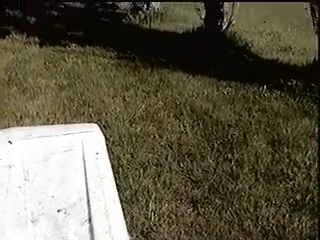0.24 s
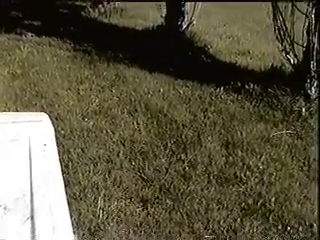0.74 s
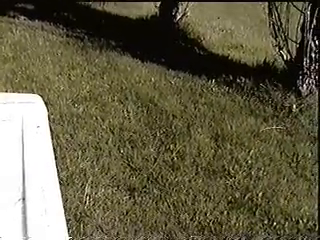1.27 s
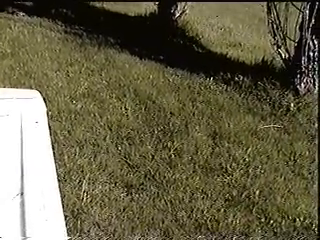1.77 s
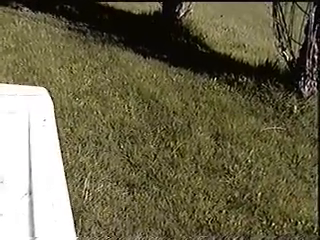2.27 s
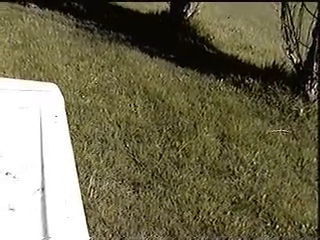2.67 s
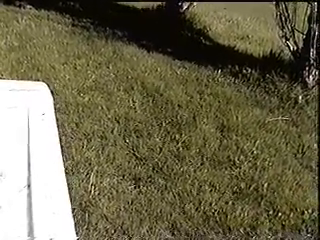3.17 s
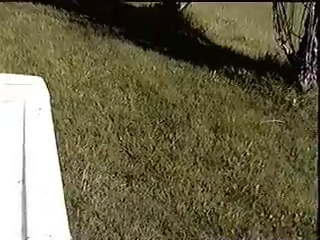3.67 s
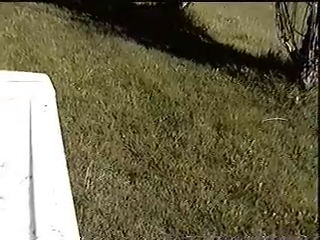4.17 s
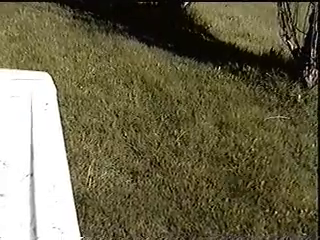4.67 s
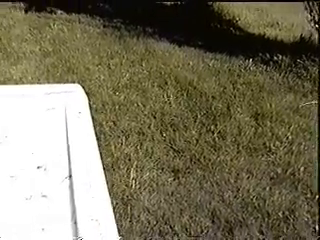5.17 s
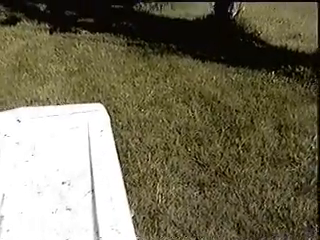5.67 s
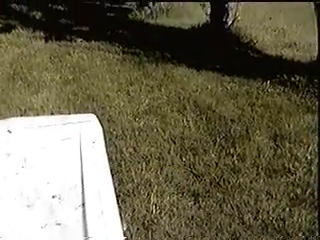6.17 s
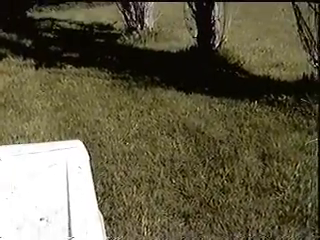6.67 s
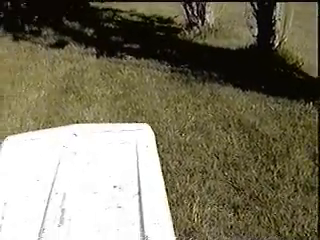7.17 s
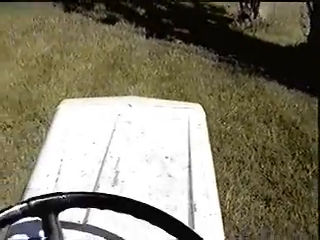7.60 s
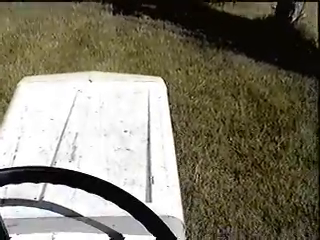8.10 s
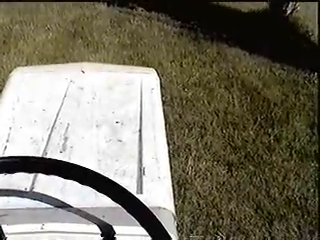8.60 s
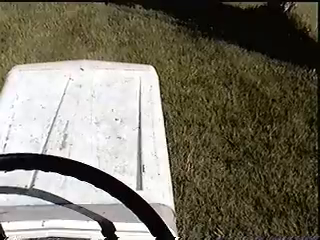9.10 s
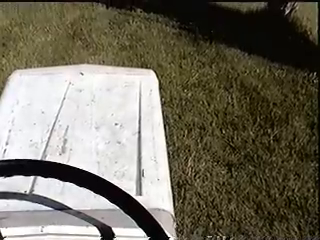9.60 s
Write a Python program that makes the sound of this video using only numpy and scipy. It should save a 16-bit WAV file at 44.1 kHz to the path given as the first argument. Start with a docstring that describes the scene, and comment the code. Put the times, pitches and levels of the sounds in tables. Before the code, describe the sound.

A quiet yard opens with a soft wash of distant sounds and leaves and a very faint far hum. From 0.4 to about 2.3 seconds a wren repeats short, sliding whistled phrases; a second bird adds quick slurs near 1.8. Small dry clicks and a brushing hand sound close by, mostly from 0.6 to 1.9, with a few around 2.9 and 3.4. At 3.6 the starter clacks in and grinds in surges, howling and ringing metal, then ratchets free by 4.4. The single-cylinder engine catches around 4.3 with heavy chuffs, roaring intake and hard clatter, speeding up until 5.5. It then holds about twenty thumps a second, with valve ticking, fan hiss and buzzing hood panels. Around 7.1 to 7.4 the panel tone shifts as the close listening point swings to face the hood. It runs steadily to the end, near 9.8.

```python
"""A lawn tractor's single cylinder catches and speeds up to a steady run: each firing thumps through the muffler.
Open intake air roars, fan and valve gear clatter as shaped noise, and hood panels buzz at their own pitches.
Before that the starter clacks in and grinds, made of noise in surges and short bursts.
At the start a wren sings sliding whistles with a second bird, and controls click as they are handled.
A steady wash of distant sounds and leaves with a faint far hum lies behind it all."""
import sys
import numpy as np
from scipy import signal
from scipy.fft import rfft, irfft, next_fast_len
from scipy.io import wavfile
from scipy.ndimage import map_coordinates

SR = 44100
rng = np.random.default_rng(int(sys.argv[2]) if len(sys.argv) > 2 else 0)


def dump_mix(stems):
    """Bounce the given channels to the path in sys.argv[1] as a 16-bit WAV at rate SR."""
    frames = np.atleast_2d(stems).T  # one column per channel
    limited = np.clip(frames, -1, 1)  # hard clip at full scale
    pcm = np.round(limited * 32767).astype(np.int16)
    wavfile.write(sys.argv[1], SR, pcm)


N = 434385
T = np.arange(N) / SR  # time of every sample, s

GOVERNED_RATE = 20.3  # the governor's setting, firings per s
CATCH_S, CATCH_RISE_S = 4.32, 0.15  # the engine catches, and its noises fade in, s

# resonances of the metal engine shroud: f/Hz, width/Hz, level/dB
SHROUD_MODES = [(431, 19, 2.5), (489, 25, 4), (647, 45, -3), (734, 23, -6.5), (901, 23, 0.5), (1237, 36, 1),
                (1423, 56, -3.5), (1546, 11, 3.5), (1940, 48, -5.5), (2655, 65, -3)]
# tone colour of the metallic clatter: f/Hz, level/dB
CLATTER_SPECTRUM = [(300, -21), (570, -14), (700, -6), (880, -3), (1100, -0.5), (1300, 1.5), (1600, 0),
                    (2000, -3.5), (2300, -2), (2700, -6), (3100, -10.5), (4200, -11), (6000, -14),
                    (12000, -78)]


def amp(db):
    """Turns decibels into an amplitude factor."""
    return 10 ** (np.asarray(db) / 20)


def unit(x):
    """Scales a signal to an rms (average strength) of 1."""
    return x / np.sqrt(np.mean(x ** 2) + 1e-20)


def along(points, hz):
    """Reads a (Hz, value) table between its points, on a logarithmic pitch axis."""
    f, v = np.transpose(points)
    return np.interp(np.log(hz + 1), np.log(f + 1), v)


def curves(rows):
    """Draws each column after the time as one value per sample."""
    s, *cols = np.transpose(rows)
    return [np.interp(T, s, c) for c in cols]


def rise(start_s, length_s):
    """A straight ramp from 0 to 1."""
    return np.clip((T - start_s) / length_s, 0, 1)


def wobble(rate):
    """A smooth random curve through `rate` random points a second."""
    return map_coordinates(rng.standard_normal(int(N * rate / SR) + 4), [T * rate])


def filtered(x, response):
    """Multiplies the spectrum of x by a response, which may be complex."""
    m = next_fast_len(N + SR // 2)
    spectrum = rfft(x, m) * response(np.fft.rfftfreq(m, 1 / SR))
    return irfft(spectrum, m)[..., :N]


def shape(points):
    """Makes a filter response from a spectrum table."""
    return lambda hz: amp(along(points, hz))


def ringing(modes):
    """The summed response of resonances, each a peak of its own width."""
    return lambda f: sum(amp(db) * 1j * f * w / (c * c - f * f + 1j * f * w) for c, w, db in modes)


def causal(points, size=8192):
    """The ring after one impulse, with the spectrum of a table and its energy as early as possible."""
    cepstrum = irfft(np.log(shape(points)(np.fft.rfftfreq(size, 1 / SR))))
    cepstrum[1:size // 2] *= 2
    cepstrum[size // 2 + 1:] = 0
    return irfft(np.exp(rfft(cepstrum)))


def noise(response, likeness=None):
    """Coloured stereo noise of rms 1; mixing mid and side sets how alike left and right are."""
    if likeness is None:
        # usual likeness of left and right: f/Hz, correlation from -1 to 1
        likeness = [(30, 0.54), (120, 0.99), (500, 0.96), (1200, 0.91), (2500, 0.86), (5000, 0.74),
                    (9000, 0.49), (14000, 0.39)]
    turn = lambda hz: np.arccos(np.clip(along(likeness, hz), -1, 1)) / 2
    mix = lambda hz: response(hz) * np.array([np.cos(turn(hz)), np.sin(turn(hz))])
    mid, side = filtered(rng.standard_normal((2, N)), mix)
    return unit(np.array([mid + side, mid - side]))


def stroke(cycle, at, width):
    """A bump once per engine cycle, centred on the share `at` of it."""
    return np.exp((np.cos(2 * np.pi * (cycle - at)) - 1) / (2 * np.pi * width) ** 2)


def bursts(rows, attack_s, t60_s):
    """The envelope of contacts (s, dB) that start quickly and die away by 60 dB in t60_s."""
    envelope, t = np.zeros(N + SR), np.arange(SR // 3) / SR
    for s, db in rows:
        contact = amp(db - 60 * t / t60_s) * (1 - np.exp(-t / attack_s))
        envelope[round(s * SR):][:len(t)] += contact ** 2  # overlapping contacts add as energy
    return np.sqrt(envelope[:N])


def exhaust(cycle, speed, throttle):
    """Each firing's puff rings the muffler; an inverted echo and then an upright one follow."""
    # tone colour of the muffler, then of the deep chuff: f/Hz, level/dB
    muffler_spectrum = [(20, -60), (60, -24), (85, -19.5), (110, -6.5), (150, -8), (200, 3.5), (255, 3),
                        (295, -8), (360, -12), (480, -24), (570, -22.5), (900, -21.5), (1500, -32),
                        (4000, -67)]
    chuff_spectrum = [(20, -12), (45, -11), (70, 4), (100, 3), (150, -10), (300, -41), (1000, -63)]
    level_db, db_per_decade = -20.5, 15  # at governed speed; growth for a tenfold speed
    cool_from_s, cool_length_s, hot_db = 5.4, 1.0, 1  # hot gas is louder until it cools

    fired = np.flatnonzero(np.diff(np.floor(cycle)) > 0)
    fired = fired[cycle[fired] > -.5]
    puffs, charges = np.zeros((2, N))
    puff_db = level_db + db_per_decade * np.log10(speed[fired] / GOVERNED_RATE)
    uneven = amp(puff_db + .5 * rng.standard_normal(len(fired)))
    # rarer firings carry more energy each, down to 14 per s
    size = uneven * np.sqrt(SR / np.maximum(speed[fired], 14))
    puffs[fired - round(.003 * SR)] = size

    # the hard-worked first firings blow hotter gas, which tunes the muffler higher until it cools
    heat = 1 - rise(cool_from_s, cool_length_s)
    cool = causal(muffler_spectrum)
    hot = causal([(hz * 1.104, db) for hz, db in muffler_spectrum])
    cool_thumps = signal.fftconvolve(puffs * (1 - heat), cool / np.linalg.norm(cool))[:N]
    hot_thumps = signal.fftconvolve(puffs * heat * amp(hot_db), hot / np.linalg.norm(hot))[:N]
    echoes = lambda hz: (1 - 0.36 * np.exp(-2j * np.pi * hz * 0.01284)
                         + 0.17 * np.exp(-2j * np.pi * hz * 0.0269))

    # a slow, full charge at open throttle adds a deep chuff
    charges[fired] = throttle[fired] / (1 + (speed[fired] / 12) ** 2)
    deep = causal(chuff_spectrum)
    chuffs = signal.fftconvolve(charges, deep / np.abs(deep).max())[:N]
    return filtered(cool_thumps + hot_thumps, echoes) + amp(-20.5) * chuffs


def intake(cycle, throttle):
    """Open throttle lets each gulp of air roar through resonances, with a sharp rasp close to each firing."""
    # resonances of the open intake: f/Hz, width/Hz, level/dB
    intake_modes = [(239.4, 33, 6), (330, 25, 3), (638, 73, 2.5), (840, 110, 6.5), (1350, 44, 6.5),
                    (1525, 35, 5.5)]
    # tone colour of the rasp: f/Hz, level/dB
    rasp_spectrum = [(2000, -29), (5500, 9), (7000, -3), (10500, 12), (15500, -6)]
    roar_db, rasp_db = -18, -37  # before the beat of the cycle and the throttle

    gulps = 0.54 + 0.56 * stroke(cycle, at=-0.49, width=0.17)
    roar = amp(roar_db) * noise(ringing(intake_modes)) * gulps * rise(4.22, 0.1)
    cracks = .5 + 0.37 * stroke(cycle, at=-0.3, width=0.15) + 1.9 * stroke(cycle, at=0.01, width=0.055)
    rasp = amp(rasp_db + 4.7 * wobble(99)) * noise(shape(rasp_spectrum)) * cracks
    return roar * throttle + rasp * rise(CATCH_S, CATCH_RISE_S) * np.sqrt(throttle)


def knocks(cycle):
    """Valves and piston strike at fixed points of the cycle and ring the shroud."""
    blows = np.zeros(N)
    for at, db in [(-.245, 0.31), (-.07, -2), (.42, -1)]:  # share of the cycle, strength in dB
        hit = np.flatnonzero(np.diff(np.floor(cycle - at)) > 0)
        blows[hit] += amp(db + 2.0 * rng.standard_normal(len(hit)))
    rung = filtered(blows, lambda hz: ringing(SHROUD_MODES)(hz) + 0.27 * shape(CLATTER_SPECTRUM)(hz))
    return unit(rung) * np.sqrt(np.mean(cycle > 1))  # allows for the silent time before running


def machinery(cycle, speed):
    """Block, fan and valve gear: noise that swells on the power stroke, with a tick as each valve shuts."""
    # tone colours of the engine block and of the fan's hiss: f/Hz, level/dB
    block_spectrum = [(20, -23), (60, -14.5), (110, -13.5), (160, -15), (200, -3.5), (290, -2), (350, 2.5),
                      (490, -2.5), (580, -6.5), (750, -4), (1300, -33), (3000, -60)]
    hiss_spectrum = [(1500, -42), (3300, 2.5), (4500, 4), (5300, -1.5), (6100, -1.5), (7200, 1),
                     (8500, 0.5), (10000, -5), (12000, -15), (15500, -39)]
    settle_s = 0.67  # the engine runs hard at the catch, then settles
    # base level of each noise, and how much louder it is at the catch
    block_db, block_strain_db = -25, 10
    clatter_db, clatter_strain_db = -20.5, 4
    hiss_db, hiss_strain_db, hiss_db_per_decade = -29.5, 12.5, 13  # last: growth for a tenfold speed

    strain = np.exp(-np.maximum(T - CATCH_S, 0) / settle_s)
    power = stroke(cycle, at=-0.4, width=0.21)
    valves = stroke(cycle, at=-0.285, width=0.019) + stroke(cycle, at=0.39, width=0.023)
    valves = valves + 1.8 * stroke(cycle, at=-0.11, width=0.052)

    block = amp(block_db + block_strain_db * strain) * unit(noise(shape(block_spectrum)) * (1 + .3 * power))

    metal = noise(shape(CLATTER_SPECTRUM)) + amp(-6) * noise(ringing(SHROUD_MODES))
    rattle = unit(metal * (1 + 0.55 * power + 0.3 * valves)) + amp(-9.0) * knocks(cycle)
    clatter = amp(clatter_db + clatter_strain_db * strain + 0.63 * wobble(45)) * rattle

    ticking = 1 + 0.16 * power + 0.29 * valves * amp(4 * wobble(40))
    fan_db = hiss_db + hiss_db_per_decade * np.log10(speed / GOVERNED_RATE) + hiss_strain_db * strain
    flicker_db = 2.6 * wobble(160) + 0.51 * wobble(3.7)
    hiss = amp(fan_db + flicker_db) * unit(noise(shape(hiss_spectrum)) * ticking)
    return (block + clatter + hiss) * rise(CATCH_S, CATCH_RISE_S)


def hood(cycle, speed):
    """Loose panels buzz at their own resonances once shaken fast enough, fluttering with each firing."""
    # resonances of the low, middle, bright and side panels: f/Hz, width/Hz, level/dB
    low_modes = [(889.4, 9.5, -1.5), (966, 17.5, 0)]
    middle_modes = [(1703, 67, -8.5), (1822, 23, 2)]
    bright_modes = [(3396, 74, 3.5), (4765, 41, -10), (7950, 28, -7.5), (12073, 20, -24)]
    side_modes = [(644, 52, 0), (2013, 99, 0)]  # heard only from beside the hood
    buzz_from_rate = 7  # firings per s
    low_db, middle_db, side_db, bright_db = -27.5, -24.5, -27, -24.6  # before the shaking
    # the listening point swings from beside the hood to face it; the middle panel is weaker from the side
    swing_s, swing_length_s, middle_aside_db = 7.1, 0.33, -6.5

    shaken = np.clip((speed - buzz_from_rate) / (GOVERNED_RATE - buzz_from_rate), 0, 1)
    aside = 1 - rise(swing_s, swing_length_s)
    low = amp(low_db) * noise(ringing(low_modes))
    middle = amp(middle_db + middle_aside_db * aside) * noise(ringing(middle_modes))
    side = amp(side_db) * aside * noise(ringing(side_modes))
    bright = amp(bright_db + 0.27 * wobble(7.8)) * noise(ringing(bright_modes))
    jolts = 1 + 0.51 * stroke(cycle, at=0.65, width=0.057) + 0.29 * stroke(cycle, at=0.88, width=0.075)
    jolts = jolts + 0.28 * stroke(cycle, at=0.058, width=.04)
    return (low + middle + side + bright) * unit(jolts) * shaken


def ratchet(count):
    """The flywheel overruns the pinion: teeth slip past evenly as (s, dB), each weaker than the last."""
    first_s, step_s = 4.2515, .0231
    first_db, loss_db = -10, 0.8  # relative level of the first tooth, loss per tooth
    return [(first_s + k * step_s, first_db - k * loss_db) for k in range(count)]


def starter():
    """The pinion slams in and grinds on the flywheel in surges, then slips past its teeth and lets go."""
    # clacks of pinion and linkage: t/s, relative level/dB
    clack_times = [(3.6112, -13.5), (3.6215, -9.5), (3.903, -16.5), (3.9204, -17), (3.9734, -17),
                   (4.0178, -21), (4.057, -13.5), (4.0965, -12.5), (4.2053, -12.5), (4.4233, -9.5)]
    # the pinion skips and makes the flywheel ring: t/s, relative level/dB
    skip_times = [(3.966, -17.5), (4.248, -19.5)]
    # tone colours of the grinding gears and of a clack: f/Hz, level/dB
    grind_spectrum = [(40, -38), (140, -8.5), (220, -6.5), (340, -3), (450, -4.5), (600, -7.5), (850, -3),
                      (1150, -8.5), (1550, -8), (2200, -16.5), (2700, -19), (3600, -22.5), (8000, -41),
                      (15000, -62)]
    clack_spectrum = [(100, -3), (600, 0), (2000, 2), (2700, -3), (3600, 1.5), (5600, 2.5), (7000, -3.5),
                      (8200, -1.5), (11000, -10.5), (15500, -21)]
    # resonances of the howling housing and of the flywheel: f/Hz, width/Hz, level/dB
    housing_modes = [(440, 32, 4), (487, 29, -1)]
    flywheel_modes = [(2600, 34, 12), (5760, 90, -15.5), (8000, 110, -21)]
    engage_s, release_s = 3.612, 4.41
    grind_db, grind_start_db, spin_up_s = -18.5, -8.5, .3  # level at speed, how far below it begins, time
    # the gears' turning makes surges: first crest, period, depth, time in which they even out
    surge_s, surge_period_s, surge_db, surge_fade_s = 3.722, .0652, 3, 0.45

    engaged = rise(engage_s, 0.01) * (1 - rise(release_s, .03))
    age = np.maximum(T - engage_s, 0)
    surges_db = surge_db * np.exp(-age / surge_fade_s) * np.cos(2 * np.pi * (T - surge_s) / surge_period_s)
    level_db = grind_db + grind_start_db * np.exp(-age / spin_up_s) + surges_db
    # the housing's howl sets in later than the grind
    howl = amp(-1.0) * noise(ringing(housing_modes)) * rise(3.75, 0.028)
    gears = noise(shape(grind_spectrum)) + howl
    # clacks also jolt the gears, once the starter is turning
    jolts = amp(-8.5) * bursts(clack_times, attack_s=0.0072, t60_s=0.14) * rise(3.75, .1)
    grind = (amp(level_db + 1.3 * wobble(70)) * engaged + jolts) * gears

    contacts = bursts(clack_times + ratchet(count=6), attack_s=0.0018, t60_s=0.093)
    clacks = amp(-3.5) * contacts * noise(shape(clack_spectrum))
    rings = amp(0.5) * bursts(skip_times, attack_s=0.0067, t60_s=.23) * noise(ringing(flywheel_modes))
    return grind + clacks + rings


def ports(x):
    """The tractor reaches the two listening ports at different strength and phase, set per frequency."""
    # how much stronger the left port is: f/Hz, left minus right/dB
    tilt = [(35, -3), (70, -7), (110, -10), (200, -6.5), (380, -1.5), (700, -1), (1300, .5), (4400, 0),
            (8000, 1), (15000, 1)]
    # how far the left port leads in phase: f/Hz, lead/rad
    lead = [(40, 1.7), (120, 1.68), (260, 0.84), (520, 0.82), (1800, 0.19), (3800, 0.25), (11000, 0.46)]
    half = lambda hz: amp(along(tilt, hz) / 2) * np.exp(.5j * along(lead, hz))
    return filtered(x, lambda hz: np.array([half(hz), 1 / half(hz)]))


def controls():
    """Dry, gritty little clicks and the brushing of a hand, both made of roughened noise."""
    # clicks of the controls: t/s, relative level/dB
    click_times = [(0.5955, -27), (1.1797, -33), (1.2027, -32), (1.4072, -27), (1.4436, -35), (1.4825, -31),
                   (1.5259, -29), (1.6117, -26.5), (1.7045, -35), (1.7762, -34), (1.919, -22),
                   (1.9274, -30), (2.8843, -29), (2.907, -34), (3.3638, -35)]
    # tone colour of clicks and brushing: f/Hz, level/dB
    click_spectrum = [(200, -24), (2500, 1.5), (5000, -5), (6500, 4), (9000, -2.5), (12000, -3.5),
                      (15500, -12)]
    # a hand brushes over the controls: middle t/s, half length/s, level/dB
    brushes = [(.63, .05, -50), (1.52, 0.19, -44.5), (2.92, 0.055, -52)]
    brush = sum(amp(db) * np.exp(-((T - s) / half_s) ** 2) for s, half_s, db in brushes)
    clicks = amp(-5.0) * bursts(click_times, attack_s=.0009, t60_s=0.061)
    touch = clicks + brush * amp(3.9 * wobble(60))
    return touch * amp(1.6 * wobble(500)) * noise(shape(click_spectrum))


def birds():
    """Whistled slurs: gliding sine tones with a quick flutter in pitch, scattered by the trees."""
    # the wren's phrases: t/s, level/dB
    phrases = [(.43, -50.5), (.825, -46.5), (1.23, -45.5), (1.634, -46), (2.04, -45.5)]
    # notes of a phrase: t after its start/s, length/s, start f/Hz, end f/Hz, relative level/dB
    phrase_notes = [(-.03, 0.046, 5300, 5780, -4), (0, 0.0277, 3740, 3150, 5.5),
                    (0.024, 0.061, 4150, 4550, -0.5), (0.04, .04, 3650, 2930, 3),
                    (0.094, .08, 2830, 3050, 3.5), (.17, .125, 2204, 2740, 2.5),
                    (0.198, 0.042, 2574, 2170, 2.5)]
    # a second bird's slurs: t/s, length/s, start f/Hz, end f/Hz, level/dB
    slurs = [(1.775, 0.041, 5800, 5330, -43), (1.822, 0.026, 4200, 5500, -41),
             (1.855, 0.028, 4100, 4920, -40), (1.873, 0.025, 4940, 5040, -45),
             (1.952, .028, 3950, 4380, -45)]
    # loudness of the birds on each side: left/dB, right/dB
    bird_side = [-0.81, 0.83]

    notes = [(s + after, length, a, b, db + rel)
             for s, db in phrases for after, length, a, b, rel in phrase_notes] + list(slurs)
    song, flutter = np.zeros(N), 1 + 0.028 * wobble(260)
    for s, length, start_hz, end_hz, db in notes:
        u = np.linspace(0, 1, round(length * SR))  # progress through the note
        span = slice(round(s * SR), round(s * SR) + len(u))
        pitch = (start_hz + (end_hz - start_hz) * u) * flutter[span]
        swell = np.sqrt(np.abs(np.sin(np.pi * u)))
        song[span] += amp(db) * swell * np.sin(2 * np.pi * np.cumsum(pitch) / SR)

    t = np.arange(SR // 2) / SR
    trees = rng.standard_normal((2, len(t))) * amp(-60 * t / 0.47)  # dies away by 60 dB in 0.47 s
    trees = trees / np.linalg.norm(trees[0])
    scattered = signal.fftconvolve(song[None], trees, axes=1)[:, :N]
    return (song + amp(2.5) * scattered) * amp(bird_side)[:, None]


def yard():
    """A wash of distant sounds and leaves (noise) with a far hum (a wavering sine), its low part to the right."""
    # tone colour of the wash: f/Hz, level/dB
    yard_spectrum = [(25, -26), (66, -13), (175, -13), (240, -4), (310, -3), (400, -10.5), (455, -6.5),
                     (580, -11), (660, -5.5), (900, -9.5), (2300, -18.5), (5500, -19), (9500, -24.5),
                     (12500, -35), (15600, -38)]
    # likeness of left and right: f/Hz, correlation from -1 to 1
    yard_likeness = [(60, -0.46), (240, 0.22), (950, 0.47), (3770, 0.43), (15000, -0.33)]
    # how much stronger the left is: f/Hz, left minus right/dB
    yard_tilt = [(200, -6.5), (380, -4), (700, -3.5), (1300, 0.5), (4400, 1)]
    wash_db, hum_db, hum_hz = -39, -56, 462  # middle values, which waver

    wash_level = amp(wash_db + 0.29 * wobble(2.46) + 0.77 * wobble(7.4))
    wash = wash_level * noise(shape(yard_spectrum), yard_likeness)
    hum_wave = np.sin(2 * np.pi * np.cumsum(hum_hz + 2.5 * wobble(12)) / SR)
    hum = amp(hum_db + 1.9 * wobble(4.9)) * unit(hum_wave)
    lean = lambda hz: amp(along(yard_tilt, hz) / 2)
    return filtered(wash + hum, lambda hz: np.array([lean(hz), 1 / lean(hz)]))


def scene():
    """Adds all sources; the engine's firings and noises follow one crankshaft."""
    # engine speed: t/s, rate/firings per s
    speed_points = [(3.6, 1.0), (4.05, 1.75), (4.3, 6.31), (4.5, 7.86), (4.7, 11.17), (4.9, 13.45),
                    (5.1, 16.89), (5.3, 19.22), (5.5, 20.37), (6.3, 20.41), (8.0, 20.52), (9.85, 20.45)]
    first_firing_s = 4.037
    governor_range = 4  # the throttle closes over this many firings per s

    speed = curves(speed_points)[0]
    cycle = np.cumsum(speed) / SR  # firings so far, one cycle each
    cycle = cycle - np.interp(first_firing_s, T, cycle)
    # the governor closes the throttle as the speed nears its setting
    throttle = np.clip((GOVERNED_RATE - speed) / governor_range, 0, 1)
    engine = exhaust(cycle, speed, throttle) + intake(cycle, throttle) + machinery(cycle, speed)
    tractor = engine + hood(cycle, speed) + starter()
    return ports(tractor) + controls() + birds() + yard()


def record(dry):
    """Rounds off the highest peaks smoothly and then removes everything above a band limit."""
    ceiling, top_hz = .9, 15850  # ceiling as a share of full scale
    rounded = dry / (1 + np.abs(dry / ceiling) ** 6) ** (1 / 6)
    return filtered(rounded, lambda hz: hz < top_hz)


dry = scene()
out = record(dry)
dump_mix(out)
```